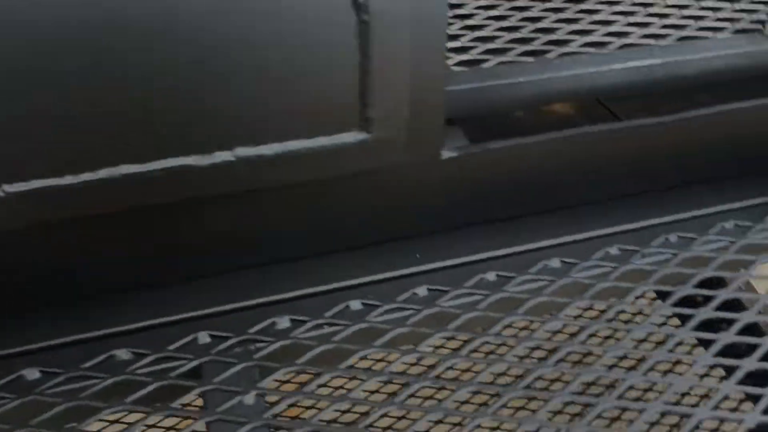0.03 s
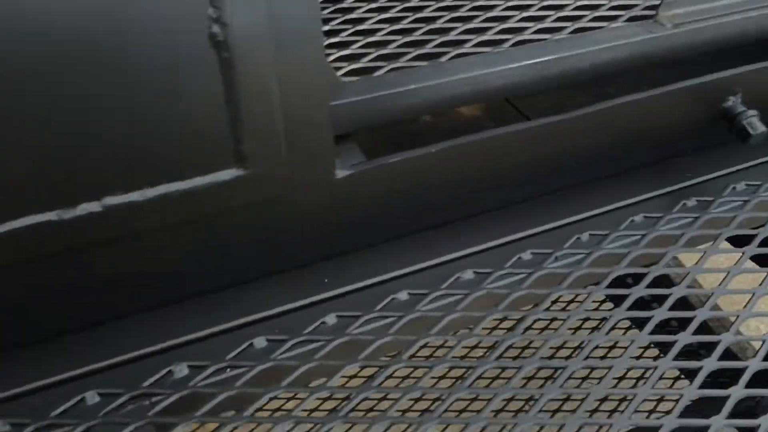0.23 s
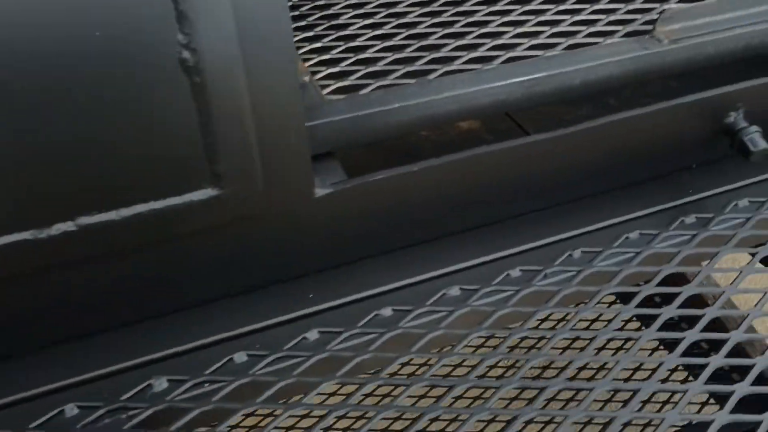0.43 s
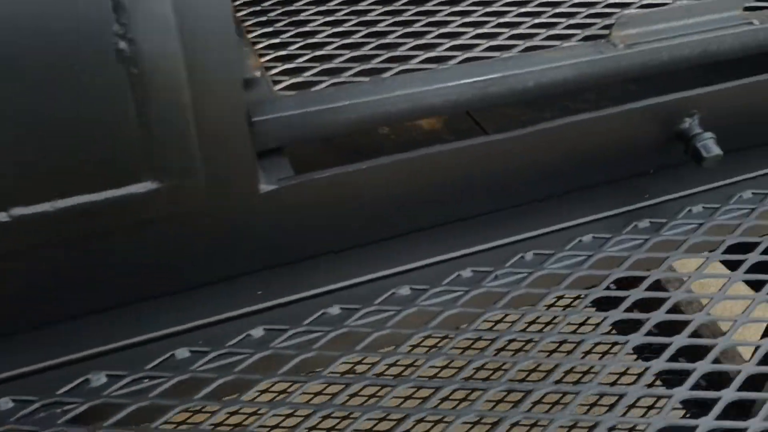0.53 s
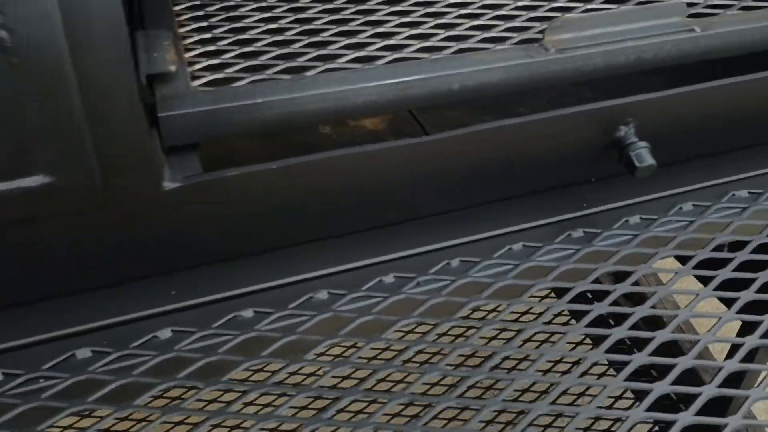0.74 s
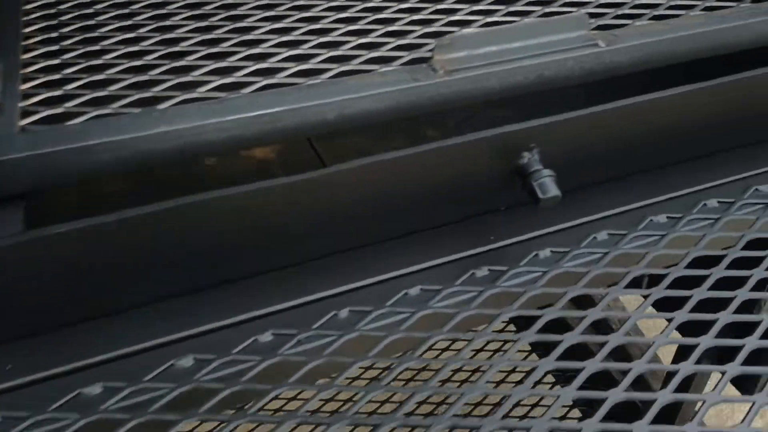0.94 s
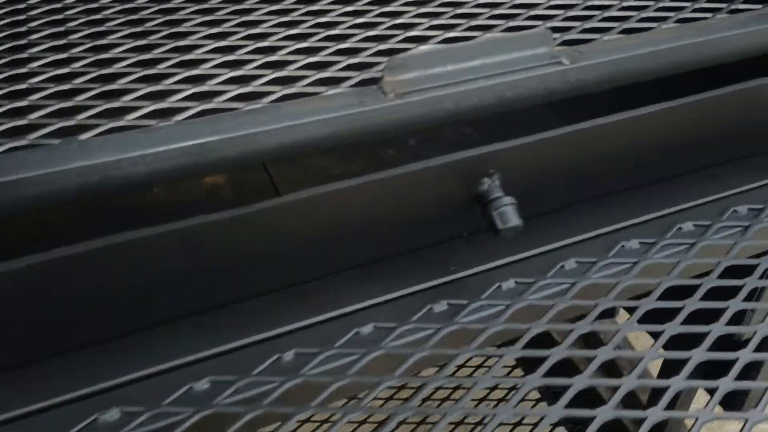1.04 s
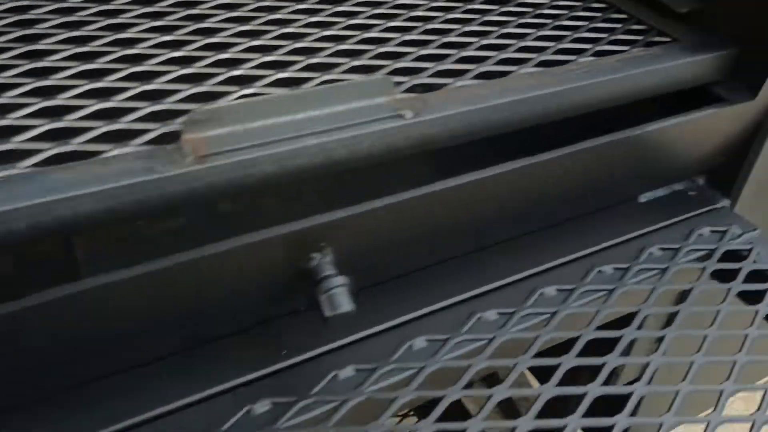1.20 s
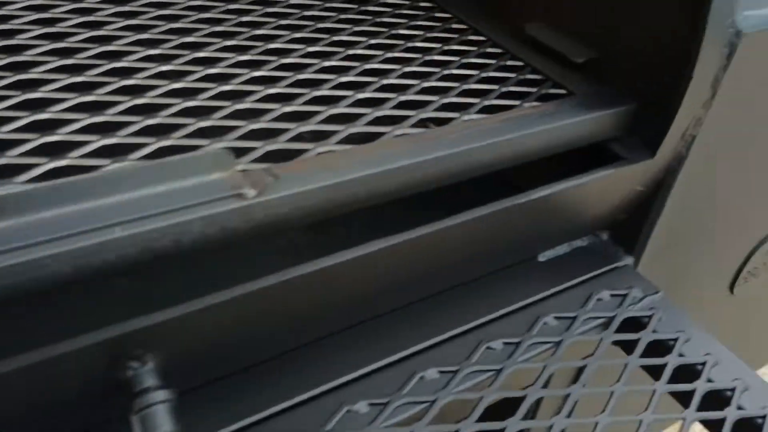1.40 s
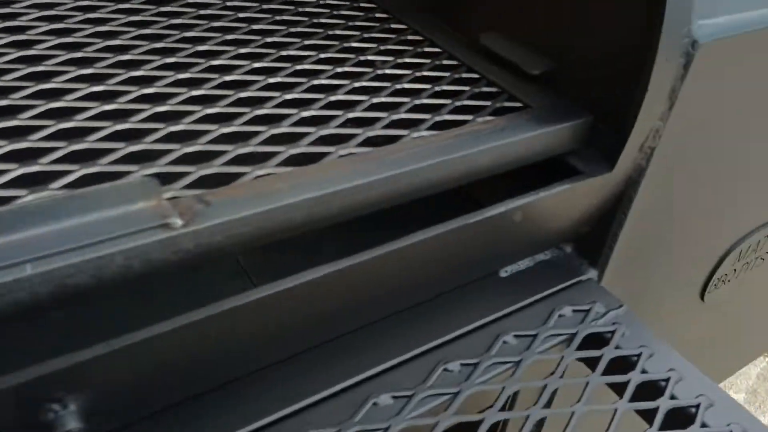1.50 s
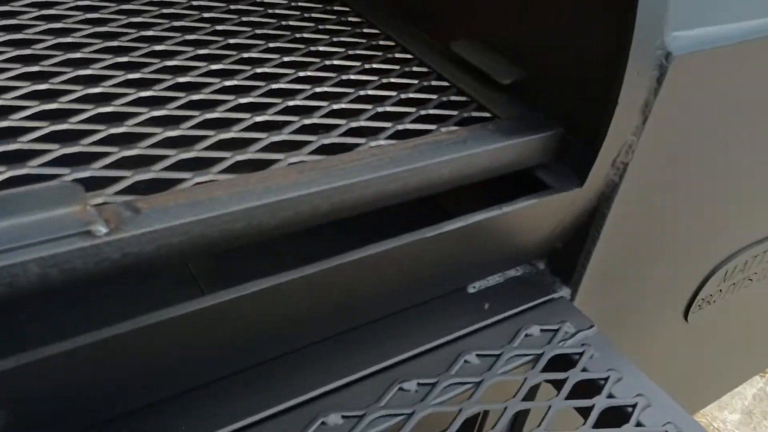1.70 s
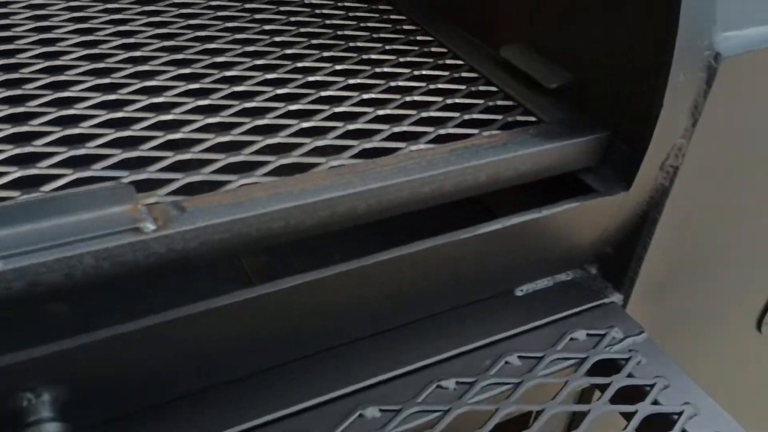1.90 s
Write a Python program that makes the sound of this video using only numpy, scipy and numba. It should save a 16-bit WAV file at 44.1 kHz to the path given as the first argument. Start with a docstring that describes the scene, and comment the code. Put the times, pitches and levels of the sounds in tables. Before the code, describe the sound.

Heavy metal door slams on a barbecue smoker, followed by light knocks, clanks and scrapes.

```python
"""A heavy steel door bangs shut on a barbecue smoker, close by and outdoors.
It lands in quick contacts and judders on its frame: the plates ring, the chamber booms.
Light damped knocks follow; then a steel fitting scrapes in stick-slip, clanks on its stop and
scrapes again. The hinge ticks and rubs faintly. Low rumble and a trace of hiss lie underneath."""
import sys
import numpy as np
from scipy import signal
from scipy.fft import rfft, irfft
from scipy.io import wavfile
from numba import njit

SR = 44100
rng = np.random.default_rng(int(sys.argv[2]) if len(sys.argv) > 2 else 0)


def generate_wav(signal):
    """Clip the signal to [-1, 1] and save it as 16-bit WAV at the path in sys.argv[1]."""
    frames = np.transpose(np.atleast_2d(signal))
    scaled = np.clip(frames, -1, 1) * 32767
    pcm = np.round(scaled).astype(np.int16)
    wavfile.write(sys.argv[1], SR, pcm)


N = 85995

# Contacts: start_s, level_db, bright_hz, bass_cut_hz
DOOR_BLOWS = [(.1983, 8, 800, 199), (.2035, -1, 9000, 38.5), (.2085, -28, 5000, 60), (.246, -8.5, 1530, 60),
              (.328, -29.5, 12450, 4150), (.447, -37.5, 9200, 2880)]  # door on frame
FITTING_BLOWS = [(1.439, -15.5, 11800, 1600), (1.446, -4, 1135, 1310), (1.6828, 1.5, 14400, 284),
                 (1.687, -6.5, 14380, 154), (1.711, -11, 5080, 710)]  # fitting on stop
KNOCK_BLOWS = [(.996, -6.5, 1080, 200), (1.0762, 3, 2600, 149), (1.081, 3, 3000, 1500),
               (1.116, -2.5, 493, 96.7), (1.261, -16, 1100, 450), (1.712, 4, 255, 195)]
HINGE_TICKS = [(.1105, -0.5, 6400, 750), (.120, -6.5, 2740, 856), (.995, -6, 7900, 3250)]

# Stick-slip runs: start_s, length_s, level_db, bright_hz, bass_cut_hz
DOOR_JUDDER = [(.37, 0.11, -7.5, 804, 233), (.54, 0.091, -7.5, 425, 195), (.69, 0.04, -9.5, 530, 425)]
FITTING_SCRAPES = [(1.441, 0.023, 10.5, 1500, 1405), (1.471, 0.051, -9.5, 6850, 1390),
                   (1.5, 0.031, 6.5, 706, 540), (1.84, 0.092, -10.5, 4550, 970),
                   (1.898, 0.049, -10.5, 5000, 1460)]
HINGE_RUBS = [(0, 0.078, -9.5, 8600, 2240), (1.03, 0.18, -5, 11900, 4700)]

# Strong modes: pitch_hz, level_db, t60_s
DOOR_MODES = [(104.7, 4, 1.42), (135, 5.5, 0.28), (191.1, 0.5, 1.43), (200, -2, 1.15), (259, -6.5, 0.65),
              (357, 2.5, 0.076), (460.5, 3, 0.27), (496.7, -7.5, 0.84), (678, -8.5, 0.65),
              (771, -9.5, 0.51), (951, -11, 0.7), (1016, -12.5, 0.35), (1174, -11.5, 0.16),
              (1435, -14, 0.31), (1715, 2.5, 0.38), (1915, -6.5, 0.52), (2670, -2, 0.51),
              (2700, -0.5, 0.19), (3750, -11.5, 0.44), (3800, -14, 0.46), (5840, -17, 0.45)]  # door and chamber
FITTING_MODES = [(843.5, 2.5, 0.37), (889, -2, 0.37), (1294, 3, 0.58), (1323, 6, 0.5), (1630, -4, 0.35),
                 (1996, 4.5, 0.3), (2046, 9, 0.2), (2552, 2.5, 0.3), (2808, 10, 0.21), (2782, 4, 0.18),
                 (3546, -1, 0.3), (3676, 7, 0.32), (4530, -2, 0.18), (5610, 7.5, 0.11), (6190, 7.5, 0.08),
                 (8740, 2.5, 0.2)]
HINGE_MODES = [(1836, 12, 0.17), (1906, 8, 0.39), (2140, 5, 0.076), (2602, 6, 0.19), (3612, 1.5, .17)]

# Envelopes of dense weak modes: freq_hz, level_per_mode_db, t60_s
DOOR_CROWD = [(48, -26, 1.2), (82, -15.5, 1.4), (103, -1.5, 1.23), (232, -12.5, 1.19), (460, -17, 0.82),
              (554, -27.5, 1.38), (857, -18.5, 0.99), (1360, -14.5, 0.88), (1720, -16.5, 0.61),
              (2300, -20, 0.53), (3770, -20, 0.46), (4040, -26.5, 0.43), (6760, -31, 0.42),
              (9560, -31, 0.14), (11570, -54, 0.12), (16000, -51.5, .15)]
FITTING_CROWD = [(161, -24, 0.58), (225, 5, 0.32), (329, -27.5, 0.36), (664, -22, 0.26), (964, -9.5, 0.55),
                 (1140, -26, 0.97), (1524, -13.5, 0.87), (2170, -5.5, 0.45), (3600, -8, 0.33),
                 (3770, -16.5, 0.31), (6130, -5.5, 0.25), (8440, -13, 0.17), (13300, -25.5, 0.096),
                 (15600, -8, 0.11)]
KNOCK_CROWD = [(200, -9.5, 0.053), (530, -21, 0.058), (854, -20, 0.11), (1280, -19.5, 0.056),
               (2660, -26, .06), (4470, -42, .04), (9000, -57.5, .03)]
HINGE_CROWD = [(700, -36.5, .15), (1096, -8.5, 0.22), (1400, -15, .15), (1960, -0.5, 0.23),
               (3080, -10.5, 0.32), (3700, -2.5, 0.17), (4570, -23, 0.16), (5800, -17, 0.21),
               (11860, -35.5, 0.087)]

# Chamber pressure pulses: start_s, level_db, start_pitch_hz, rise_s
CHAMBER_PULSES = [(0.1956, -11.5, 147.5, 0.016), (0.228, -22, 120, 0.023), (0.277, -23, 123, 0.015)]
# Stereo balance of all modes: freq_hz, left_minus_right_db
MODE_BALANCE = [(300, -0.5), (800, 0.5), (2400, -3.5), (4400, -7.5), (8100, -13.5), (15000, -14.5)]
# Rumble envelope: time_s, level_db
RUMBLE_SWELLS = [(0, -61), (.11, -94.5), (.5, -57.5), (0.641, -47), (.72, -62), (.8, -51), (0.868, -75),
                 (1.002, -66.5), (1.381, -68), (1.441, -61.5), (1.5, -70), (1.734, -61), (1.809, -75),
                 (1.87, -60.5)]
# Outdoor noise spectrum: freq_hz, relative_density_db
AIR_SPECTRUM = [(25, -10.5), (55, -8), (95, 6), (140, 2), (220, -2.5), (400, -6), (700, -15.5), (1500, -24),
                (3500, -28.5), (6000, -32.5), (9000, -44), (15000, -39.5)]


def door():
    """Blows and judder on the frame ring the plates; the ring drops as the door comes to rest."""
    strong = undb(-35) * ring(DOOR_MODES, diffuse_hz=1830)
    plate_modes = crowd(DOOR_CROWD, count=1100, scatter_db=2.5)
    weak = undb(-36.5) * ring(plate_modes, diffuse_hz=960, uneven_db=8.5)
    rise_s = 0.00012
    bang = drive(blows(DOOR_BLOWS), strong + weak, rise_s)
    judder = drive(stick_slip(DOOR_JUDDER), undb(-2.5) * strong + weak, rise_s)
    rest_s, fade_s, rest_db = 0.65, 0.057, -6
    settled = np.clip((np.arange(N) / SR - rest_s) / fade_s, 0, 1)
    return (bang + judder) * undb(rest_db * settled)


def chamber_boom():
    """The door pushes on the chamber: deep pressure pulses, falling in pitch."""
    return sum(tone_burst(*pulse, sag_hz_per_s=620) for pulse in CHAMBER_PULSES)


def fitting():
    """Clanks and scrapes ring one bright steel piece; sliding excites its strong modes less."""
    strong = undb(-50.5) * ring(FITTING_MODES, diffuse_hz=1720)
    weak_modes = crowd(FITTING_CROWD, count=1000, scatter_db=1)
    weak = undb(-52.5) * ring(weak_modes, diffuse_hz=835, uneven_db=-5)
    rise_s, crack_db = 0.0019, 4
    clanks = drive(blows(FITTING_BLOWS), strong + weak, rise_s, crack_db)
    scrapes = drive(stick_slip(FITTING_SCRAPES), undb(-7.5) * strong + weak, rise_s, crack_db)
    return clanks + scrapes


def knocks():
    """Light blows on quickly damped modes; one carries a short hollow note."""
    body = ring(crowd(KNOCK_CROWD, count=420, scatter_db=0.5), diffuse_hz=1500)
    note = tone_burst(start_s=1.0725, level_db=-42.5, pitch_hz=1310, rise_s=0.005)
    return undb(-47.5) * drive(blows(KNOCK_BLOWS), body, rise_s=0.001) + note


def hinge():
    """Thin ringing ticks; a toneless rub drives the weak modes only."""
    weak = ring(crowd(HINGE_CROWD, count=260, scatter_db=2.5), diffuse_hz=1750)
    strong = ring(HINGE_MODES, diffuse_hz=1100)
    ticks = drive(blows(HINGE_TICKS), strong + weak, rise_s=0.002)
    rub = drive(stick_slip(HINGE_RUBS), weak, rise_s=0.001)
    return undb(-65) * (ticks + rub)


def rumble():
    """Narrow band of bass noise that comes and goes."""
    centre_hz, half_width_hz = 96, 21.2
    hz = np.fft.rfftfreq(N, 1 / SR)
    band = irfft(rfft(rng.standard_normal(N)) / (1 + ((hz - centre_hz) / half_width_hz) ** 4), N)
    level_db = np.interp(np.arange(N) / SR, *np.array(RUMBLE_SWELLS).T)
    return band / band.std() * undb(level_db)


def outdoor_air():
    """Faint low noise with a trace of hiss, near mono in the bass, drifting in level."""
    hz = np.maximum(np.fft.rfftfreq(N, 1 / SR), 1)
    mid, side = rfft(rng.standard_normal((2, N))) * undb(lookup(hz, AIR_SPECTRUM))
    width = np.clip(hz / 900, 0.15, 1)
    noise = irfft(mid + np.array([[1], [-1]]) * side * width, N)
    drift_db = 0.5 * np.interp(np.arange(N), np.linspace(0, N, 20), rng.standard_normal(20))
    return noise / noise.std() * undb(-66.5 + drift_db)


def blows(table):
    """Impact force: one filtered impulse per contact."""
    return sum(undb(level_db) * band_limit(signal.unit_impulse(N, int(start_s * SR)), bright_hz, cut_hz)
               for start_s, level_db, bright_hz, cut_hz in table)


def stick_slip(table, slips_per_s=1300, scatter_db=5):
    """Friction force: steel catches and slips in tiny uneven pushes."""
    time_s = np.arange(N) / SR
    force = 0
    for start_s, length_s, level_db, bright_hz, cut_hz in table:
        slips = (rng.random(N) < slips_per_s / SR) * undb(scatter_db * rng.standard_normal(N))
        slips *= rng.choice([-1, 1], N)
        slips *= (time_s > start_s) & (time_s < start_s + length_s)
        slips /= np.sqrt(np.sum(slips ** 2) + 1e-9)
        force += undb(level_db) * band_limit(butterworth(slips, bright_hz), bright_hz, cut_hz)
    return force


def drive(force, body, rise_s, crack_db=0, crack_s=0.004):
    """Force through a body's response; vibration spreads over rise_s, crack_db lifts the onset."""
    age_s = np.arange(N) / SR
    spread = 1 - np.exp(-age_s / rise_s)
    crack = undb(crack_db * np.exp(-age_s / crack_s))
    return signal.fftconvolve(force[None], body * spread * crack, axes=1)[:, :N]


def crowd(envelope, count, scatter_db):
    """Irregularly spaced plate modes, sparser and more uneven toward the treble."""
    position = (np.arange(count) + rng.random(count)) / count
    hz = 40 + 16000 * position ** 1.5
    level_db = lookup(hz, envelope) + scatter_db * np.sqrt(position) * rng.standard_normal(count)
    return np.column_stack([hz, level_db, lookup(hz, envelope, column=2)])


def ring(modes, diffuse_hz, uneven_db=0):
    """Stereo impulse response of the modes; the channels diverge up to diffuse_hz."""
    hz, level_db, t60_s = np.array(modes, float).T.copy()
    phase_draw, offset_draw, balance_draw = rng.uniform(-0.98, 1, (len(hz), 3)).T
    sides = np.array([[0.5], [-0.5]])
    width = np.clip(hz / diffuse_hz, 0.2, 1)
    phase = np.pi * (phase_draw + sides * width * offset_draw)
    balance_db = lookup(hz, MODE_BALANCE) + uneven_db * width * balance_draw
    return damped_sines(hz, t60_s, undb(level_db + sides * balance_db) * np.exp(1j * phase))


@njit
def damped_sines(hz, t60_s, amplitude):
    """Sum of decaying sines, one complex amplitude per channel and mode."""
    stereo = np.zeros((2, N))
    for k in range(len(hz)):
        pole = np.exp((2j * np.pi * hz[k] - np.log(1000) / t60_s[k]) / SR)
        phasor = 1 + 0j
        for i in range(min(N, int(1.3 * t60_s[k] * SR))):
            stereo[0, i] += (phasor * amplitude[0, k]).imag
            stereo[1, i] += (phasor * amplitude[1, k]).imag
            phasor *= pole
    return stereo


def tone_burst(start_s, level_db, pitch_hz, rise_s, sag_hz_per_s=0):
    """A few sine cycles that peak at rise_s and die."""
    age_s = np.maximum(np.arange(N) / SR - start_s, 0)
    swell = (age_s / rise_s * np.exp(1 - age_s / rise_s)) ** 5.5
    cycles = (pitch_hz - sag_hz_per_s * age_s / 2) * age_s
    return undb(level_db) * swell * np.sin(2 * np.pi * cycles)


def band_limit(force, bright_hz, cut_hz):
    """Softer contacts are duller (low-pass), lighter ones thinner (steep bass cut)."""
    return butterworth(butterworth(force, bright_hz), cut_hz, "high", order=6)


def butterworth(x, hz, kind="low", order=2):
    """Low- or high-pass."""
    sos = signal.butter(order, min(hz, SR / 2 - 1000), kind, fs=SR, output="sos")
    return signal.sosfilt(sos, x + 1e-18)


def lookup(hz, table, column=1):
    """Interpolate a column over log frequency."""
    rows = np.array(table, float)
    return np.interp(np.log(hz), np.log(rows[:, 0]), rows[:, column])


def undb(db):
    """Decibels to gain."""
    return 10 ** (np.asarray(db) / 20)


def scene():
    """Stereo sum of all sources."""
    return door() + chamber_boom() + fitting() + hinge() + knocks() + rumble() + outdoor_air()


def record(dry):
    """Steep low-pass at 16 kHz."""
    return signal.sosfilt(signal.ellip(8, 0.2, 70, 16000, fs=SR, output="sos"), dry)


dry = scene()
out = record(dry)
generate_wav(out)
```